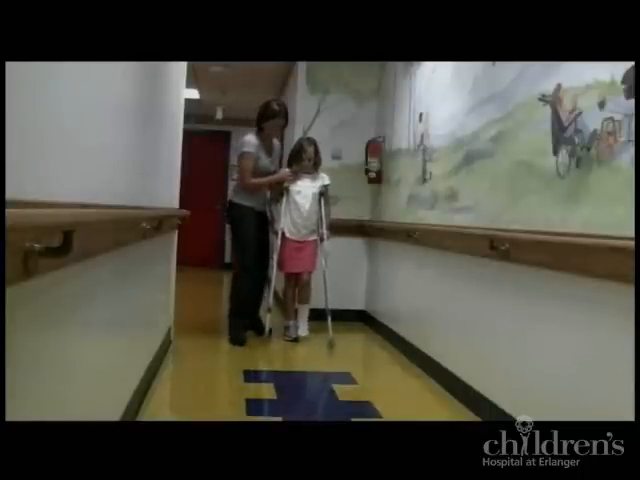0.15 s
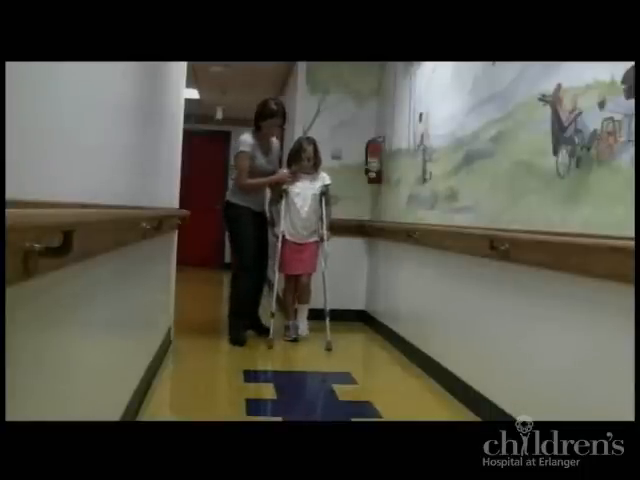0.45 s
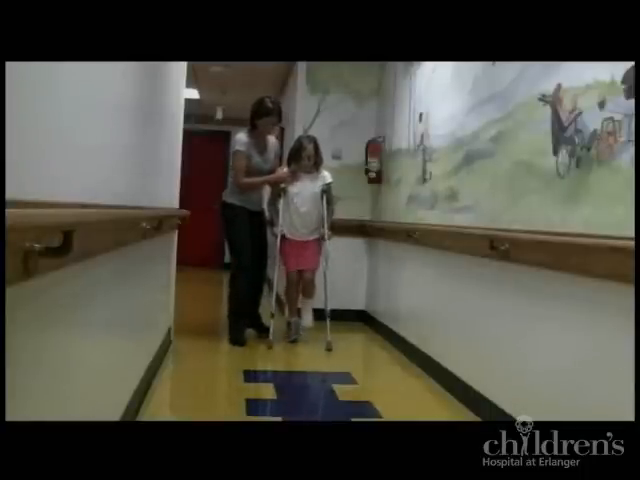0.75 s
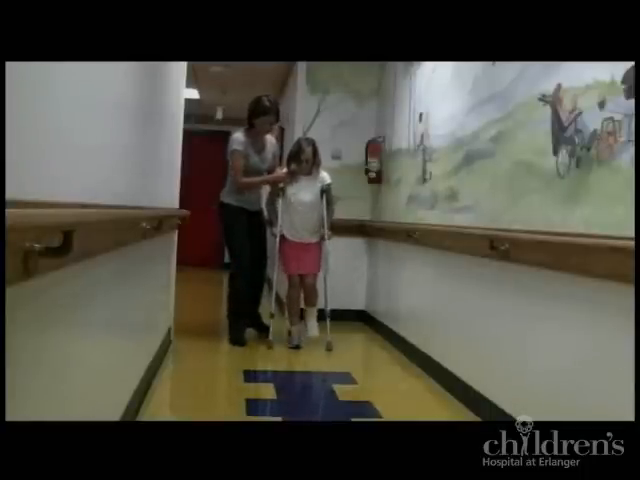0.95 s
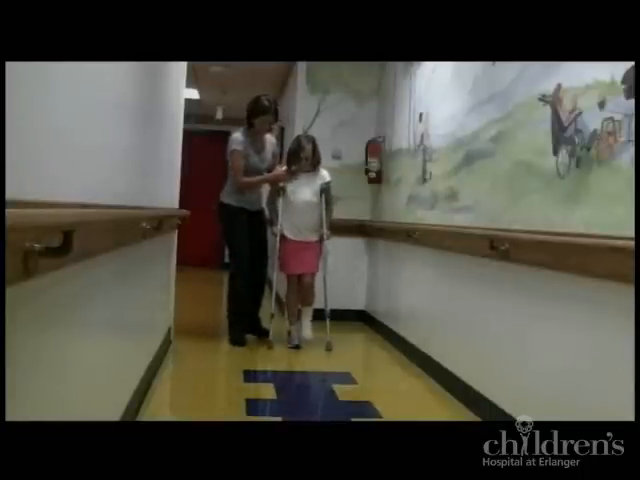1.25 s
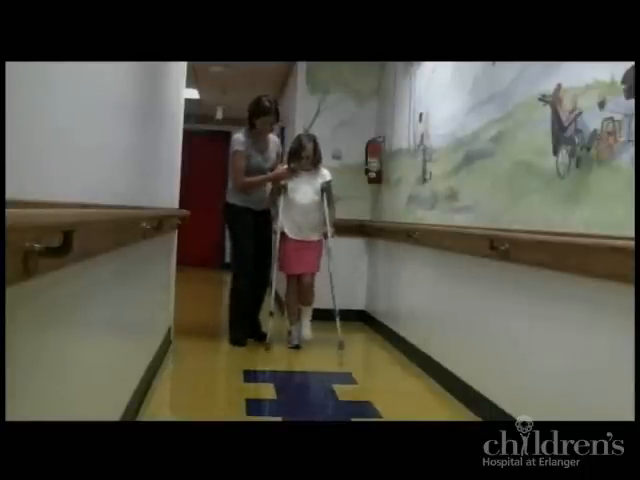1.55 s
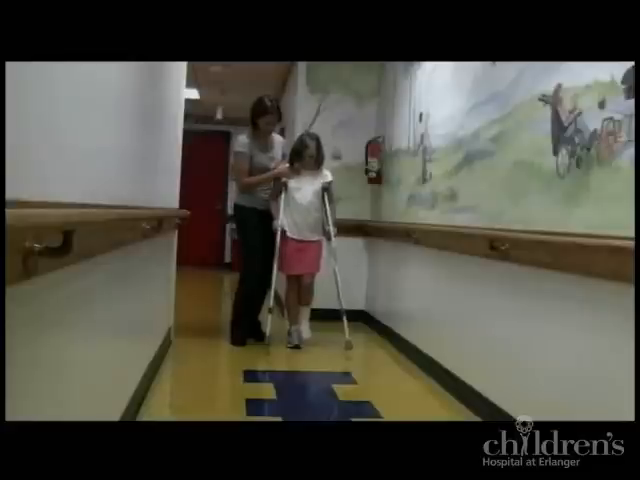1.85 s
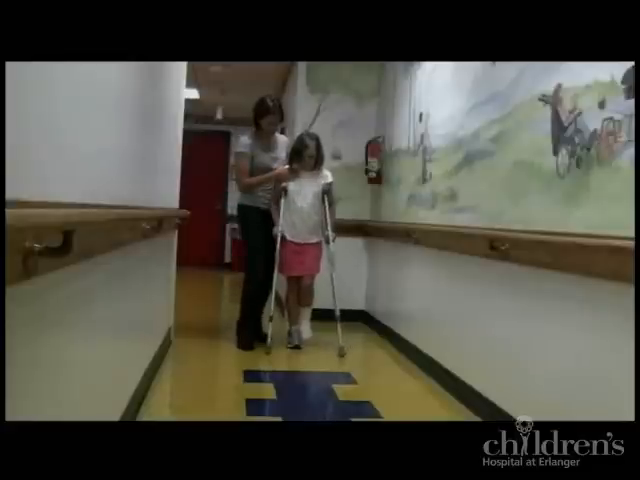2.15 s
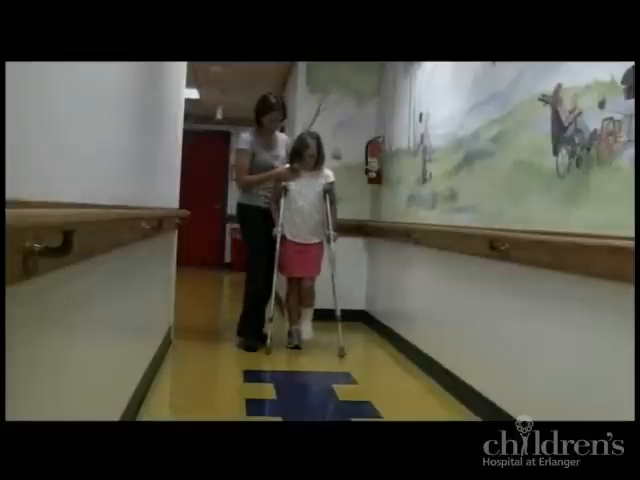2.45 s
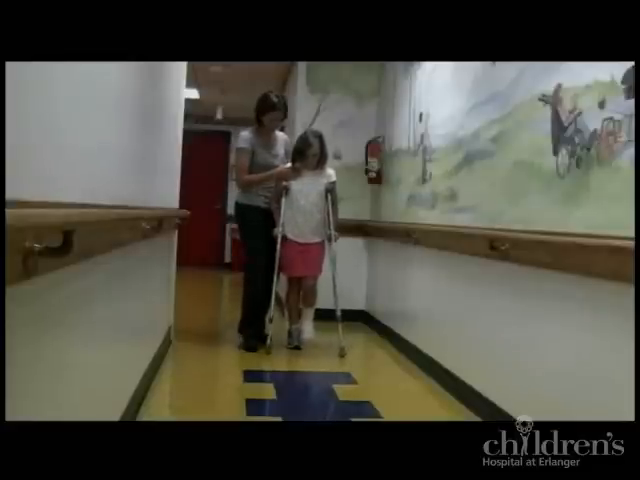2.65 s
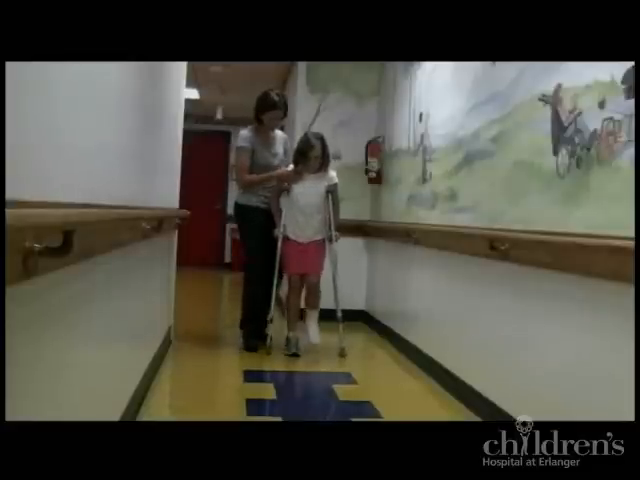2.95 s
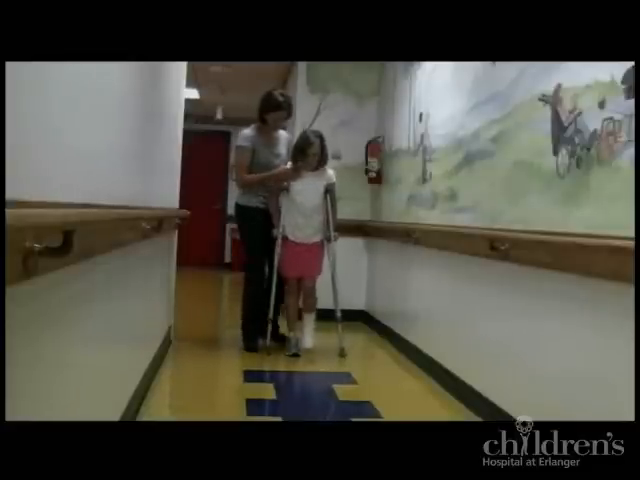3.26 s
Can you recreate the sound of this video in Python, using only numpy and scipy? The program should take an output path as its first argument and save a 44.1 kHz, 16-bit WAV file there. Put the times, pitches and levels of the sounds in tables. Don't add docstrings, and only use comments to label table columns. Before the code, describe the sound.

Metal crutches clack down a hard corridor: a soft touch at 0.4 s, then a loud rattle at 0.5. A scuff and faint rubber squeaks lead to a slapping shoe thump at 1.0. A clear clack rings at 1.4, a cluster of knocks at 2.2-2.4, then scuffing and a second thump at 3.05. Tiny joint creaks, short wall echoes and steady soft ventilation and lamp hum surround it.

```python
import sys
import numpy as np
from scipy import signal
from scipy.io import wavfile
from scipy.ndimage import uniform_filter1d

SR = 44100
rng = np.random.default_rng(int(sys.argv[2]) if len(sys.argv) > 2 else 0)


def unload_wav(signal):
    wavfile.write(
        sys.argv[1],
        SR,
        np.round(np.clip(np.atleast_2d(signal).T, -1, 1) * 32767).astype(np.int16),
    )


def gain_from_db(level_db):
    decades = np.asarray(level_db, float) / 20
    return 10 ** decades


N = 149940
LEAD_S = 0.004


def evened(x):
    return x / np.sqrt(np.mean(x ** 2) + 1e-20)


def sized(x, db):
    return gain_from_db(db) * np.sqrt(SR / 20) * x / np.linalg.norm(x)


def read(points, hz):
    f, value = np.transpose(points)
    return np.interp(np.log(hz + 1), np.log(f + 1), value)


def add(mix, start_s, sound):
    part = mix[max(round(start_s * SR), 0):][:len(sound)]
    part += sound[:len(part)]


def click(colour, tilt_db=0):
    hz = abs(np.fft.fftfreq(2048, 1 / SR))
    tilt = tilt_db * np.log2((hz + 300) / 3000)
    log_gain = np.log(gain_from_db(read(colour, hz) + tilt))
    x = np.fft.ifft(np.exp(np.conj(signal.hilbert(log_gain)))).real[:1024]
    return x / np.linalg.norm(x)


def rings(modes):
    t = np.arange(16000) / SR
    x = sum(gain_from_db(db - 60 * t / t60) * np.sin(2 * np.pi * hz * t) for hz, db, t60 in modes)
    return x / np.linalg.norm(x)


def rattle(length_s, per_s, spread_db):
    chance, size, sign = rng.random((3, 4000))
    t = np.arange(4000) / SR - LEAD_S
    knocks = (chance < per_s / SR) * np.sign(sign - 0.5) * gain_from_db(-spread_db * np.log(size + 0.016))
    first_touch = gain_from_db(-23.5) * np.minimum(1 + t / LEAD_S, 1)
    swell = np.clip(t / 0.0021, 0, 1) + first_touch
    decay = np.exp(-(np.maximum(t, 0) / max(length_s, 0.0005)) ** 1.43)
    return knocks * swell * decay


def knock(out, start_s, level_db, body, length_s, per_s, spread_db):
    layer = np.zeros(out.shape)
    knocks = signal.fftconvolve(rattle(length_s, per_s, spread_db), body)
    add(layer[0], start_s - LEAD_S, sized(knocks, level_db))
    add(layer[1], start_s + length_s / 3, sized(body, level_db))
    return out + layer


def band(hz, width_hz):
    turn = np.exp(2j * np.pi * np.cumsum(hz) / SR)
    r = np.exp(-np.pi * width_hz / SR)
    z = rng.standard_normal(len(hz)) + 1j * rng.standard_normal(len(hz))
    waver = signal.lfilter([1 - r], [1, -r], z) * 0.5 / np.sqrt(1 - r)
    return evened((turn * (1 + waver)).real)


# pitch_hz, level_db
VENTILATION_COLOUR = [(25, -23), (90, -14), (108, -6.5), (480, -9), (1140, -21.5), (3000, -32.5),
                      (11900, -42.5), (12500, -60)]
# pitch_hz, level_db, width_hz
LAMP_HUM = [(123.1, -54, 1), (239.5, -54.5, 2.7), (181, -60, 11)]


def air():
    frames, hz = N // 512 + 5, np.fft.rfftfreq(2048, 1 / SR)
    a, b, patches = rng.standard_normal((frames, 1025, 3)).T
    patches = uniform_filter1d(patches, size=20, axis=0)
    patches = evened(uniform_filter1d(patches, size=7, axis=1))
    z = (a + 1j * b) * gain_from_db(read(VENTILATION_COLOUR, hz)[:, None] + 0.5 * patches)
    wash = gain_from_db(-48) * evened(signal.istft(z, nperseg=2048, noverlap=1536)[1][:N])
    return wash + sum(gain_from_db(db) * band(np.full(N, hum_hz), width) for hum_hz, db, width in LAMP_HUM)


# pitch_hz, t60_s
CORRIDOR_DECAY = [(150, 0.68), (400, 0.53), (1000, 0.41), (2800, 0.34), (7000, 0.32), (12000, 0.3)]


def corridor(direct, sent):
    early_t60_s, build_up_s, early_db, late_db = 0.097, 0.0028, -2.5, -1.5
    out, s = np.zeros(N), np.arange(SR) / SR
    turn = np.arange(N) / SR * 1.718
    for k in range(3):
        taps = np.zeros(SR)
        at = np.arange(50, SR - 20, 20)
        taps[at + rng.integers(0, 20, len(at))] = rng.choice([-1., 1.], len(at))
        early = taps * gain_from_db(-60 * s / early_t60_s)
        hz, t, z = signal.stft(taps, SR, nperseg=256)
        decay = gain_from_db(-60 * t / read(CORRIDOR_DECAY, hz)[:, None])
        late = signal.istft(z * decay, SR, nperseg=256)[1][:SR]
        late *= 1 - np.exp(-s / build_up_s)
        share = np.sqrt(2 / 3) * np.cos(np.pi * (turn + k / 3))
        out += gain_from_db(early_db) * signal.fftconvolve(direct * share, early / np.linalg.norm(early))[:N]
        out += gain_from_db(late_db) * signal.fftconvolve(sent * share, late / np.linalg.norm(late))[:N]
    return out


# middle_s, length_s, level_db
DRAGS = [(.01, 0.047, -49.5), (0.326, 0.05, -61.5), (0.65, 0.42, -55), (0.864, 0.084, -50),
         (1.305, 0.36, -64), (1.958, 0.31, -59), (2.244, 0.049, -42.5), (2.43, 0.17, -56),
         (2.703, 0.23, -57.5), (2.912, .18, -53)]
# pitch_hz, level_db
DRAG_COLOUR = [(400, -3), (1000, 4), (2200, -0.5), (4000, -4), (7000, -11.5), (11800, -21.5), (12500, -39)]
# start_s, length_s, level_db, start_hz, end_hz
RUBBER_SQUEAKS = [
    (.65, .08, -60, 1060, 1100),
    (.675, .135, -55, 1250, 1550),
    (.815, .15, -51, 925, 895),
    (2.9, .07, -61, 1020, 1030),
]


def friction():
    t = np.arange(N) / SR
    grain = evened(uniform_filter1d(rng.standard_normal(N), size=150))
    grit = rng.standard_normal(N) * gain_from_db(-4 * grain)
    stroke = sum(gain_from_db(db) * np.exp(-((t - s) / (length / 2)) ** 2) for s, length, db in DRAGS)
    out = stroke * evened(signal.oaconvolve(grit, click(DRAG_COLOUR))[:N])
    for start_s, length_s, level_db, from_hz, to_hz in RUBBER_SQUEAKS:
        progress = np.minimum(np.arange(6600) / SR / length_s, 1)
        tone = band(from_hz + (to_hz - from_hz) * np.sqrt(progress), width_hz=28)
        add(out, start_s, gain_from_db(level_db) * np.sqrt(np.sin(np.pi * progress) + 1e-9) * tone)
    return out


# start_s, thump_db, slap_db
LANDINGS = [
    (0.9927, -24, -21.5),
    (3.0535, -23.5, -22),
]
# pitch_hz, level_db, t60_s
FLOOR_MODES = [
    [(193, -8, 0.4), (263.3, -14, 0.38), (292, 7, 0.067), (271.7, -17, 0.57), (397, -8, 0.32),
     (431, -7.5, 0.19), (490, -10, 0.26), (616, -13.5, 0.41), (706, -5, 0.16), (987, -14, 0.4)],
    [(185.2, -19.5, 0.92), (246, -9, 0.45), (281, 4, 0.097), (370, -5, 0.38), (417, -4, 0.38),
     (457, -4, 0.26), (560, -17, 0.1), (670, -11, 0.27), (755, -13, 0.26)],
]
# pitch_hz, level_db
SLAP_COLOURS = [
    [(120, -60), (280, -4.5), (800, -3), (1600, -13.5), (2600, -8.5), (4500, -17), (10500, -34.5),
     (12200, -49)],
    [(120, -60), (330, -3), (1200, -9), (3200, -16.5), (4600, -11.5), (6500, -23), (9800, -33.5),
     (11000, -60)],
]


def shoe():
    slap, thump = np.zeros((2, N)), np.zeros(N)
    push = np.exp(-(np.arange(-90, 90) / SR / 0.0004) ** 2)
    for (start_s, thump_db, slap_db), modes, colour in zip(LANDINGS, FLOOR_MODES, SLAP_COLOURS):
        ringing = np.gradient(np.convolve(push, rings(modes)))
        add(thump, start_s, sized(ringing, thump_db))
        slap = knock(slap, start_s, slap_db, click(colour), length_s=0.013, per_s=6000, spread_db=1.8)
    return slap, thump


# start_s, level_db, rattle_s, tilt_db per octave, ring_db relative to the clack
TUBE_CLACKS = [
    (.378, -42, .012, -0.8, -3.5),
    (0.4875, -27.5, .03, 0.4, -13),
    (1.37, -28.5, .014, 0.5, -3),
    (2.2102, -40.5, .016, -1, -5),
    (2.2853, -29.5, .014, -1.2, -3.5),
    (2.3804, -38, .014, -0.3, 1),
]
# pitch_hz, level_db, t60_s
TUBE_MODES = [
    [(1230, 1.5, 0.016), (5120, -8, 0.026), (6640, -6, 0.018)],
    [(1930, -3, 0.037), (4670, -1.5, .03), (6700, 2, .02)],
    [(1558, 0, 0.051), (2484, -0.5, 0.042), (3637, -1, 0.034), (4730, -2, 0.048), (6234, 3.5, 0.033)],
    [(1506, -2, 0.055), (6210, 1, 0.025)],
    [(1280, -7, 0.03), (2550, -0.5, 0.021), (3620, -3, 0.035), (6500, 6, .03), (10700, -4.5, 0.045),
     (12414, -9, 0.042)],
    [(2270, 4, 0.01), (2740, 2, 0.0096), (6600, -5, 0.0088)],
]
# pitch_hz, level_db
METAL_COLOUR = [(150, -60), (600, -7), (1200, -2), (2000, -2), (5000, -3.5), (7000, -6), (10900, -10),
                (13000, -16.5)]
# start_s, level_db
JOINT_CREAKS = [(0.029, -67), (.087, -60), (.262, -66), (.286, -60.5), (.322, -58.5), (.356, -59),
                (.816, -68), (1.667, -93), (1.793, -65), (1.864, -64.5), (1.944, -58.5), (2.355, -43.5),
                (2.557, -60), (2.873, -59.5), (3.235, -57.5)]
# pitch_hz, level_db
CREAK_COLOUR = [(500, -46), (1200, 8), (2200, 4), (3500, 6), (5500, 0), (9000, -6.5), (12500, -18)]


def crutches():
    out = np.zeros((2, N))
    per_s, spread_db = 9000, 1.5
    for (start_s, level_db, rattle_s, tilt_db, ring_db), modes in zip(TUBE_CLACKS, TUBE_MODES):
        out = knock(out, start_s, level_db, click(METAL_COLOUR, tilt_db), rattle_s, per_s, spread_db)
        out = knock(out, start_s, level_db + ring_db, rings(modes), 0.00073, per_s, spread_db)
    for start_s, level_db in JOINT_CREAKS:
        out = knock(out, start_s, level_db, click(CREAK_COLOUR), length_s=0.0031, per_s=5000, spread_db=0.7)
    return out


def scene():
    slap, thump = shoe()
    direct, sent = crutches() + slap + friction()
    echoes = corridor(direct, sent + gain_from_db(-1.5) * thump)
    return (gain_from_db(-3) * (direct + echoes) + thump + air())[None]


def low_pass(x):
    return signal.sosfilt(signal.butter(12, 13730, fs=SR, output="sos"), x)


def record(dry):
    lowpass = signal.firwin(511, 13000, window=("kaiser", 9), fs=SR)
    finished = signal.oaconvolve(dry, lowpass[None], "same")
    return low_pass(finished)


dry = scene()
out = record(dry)
unload_wav(out)
```